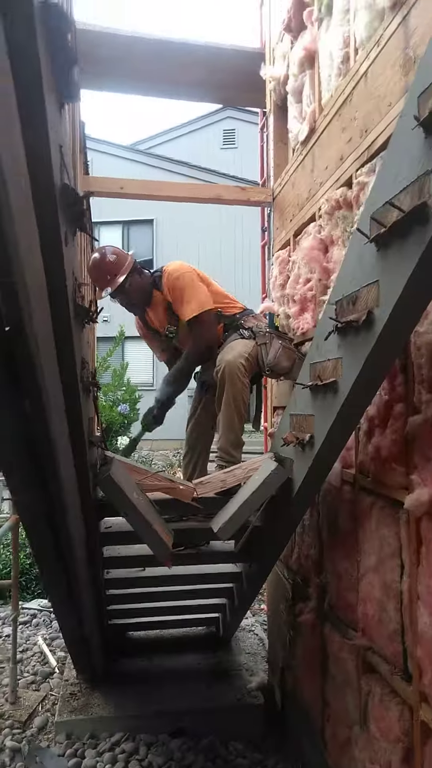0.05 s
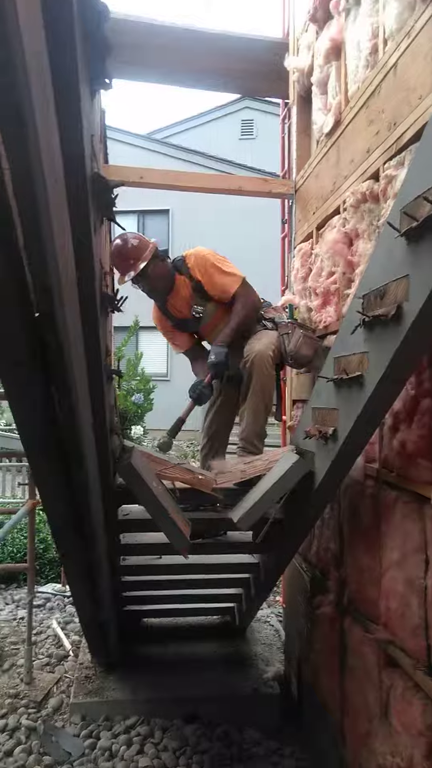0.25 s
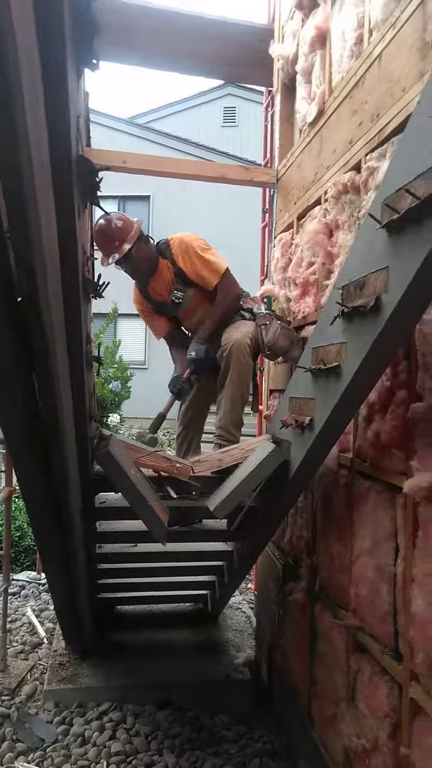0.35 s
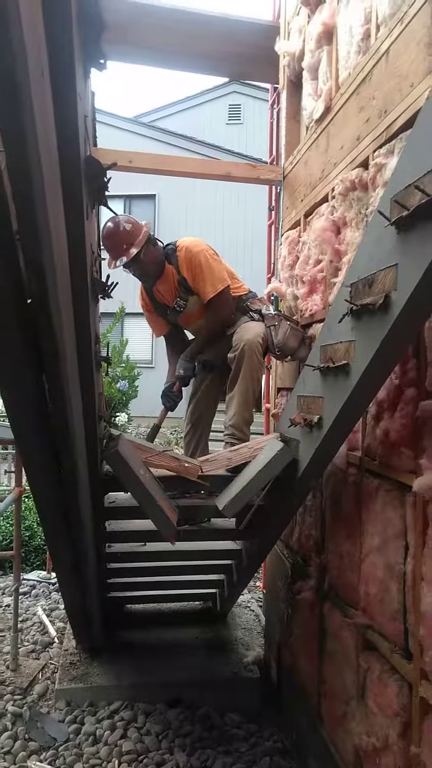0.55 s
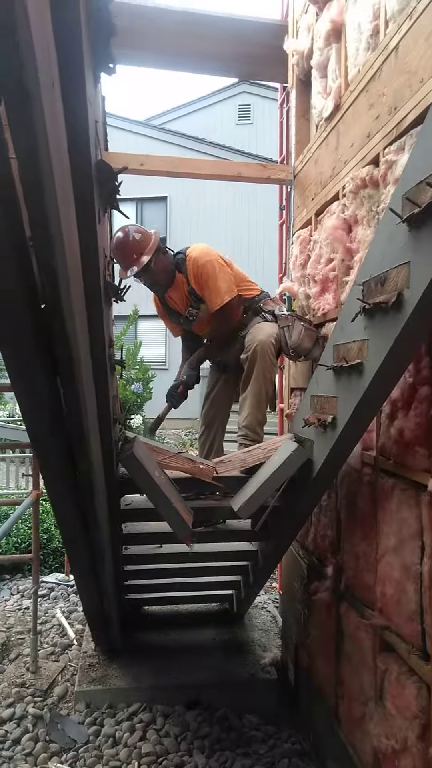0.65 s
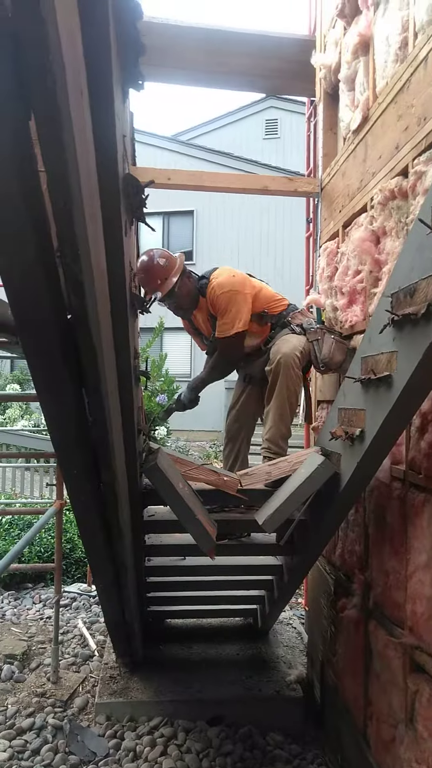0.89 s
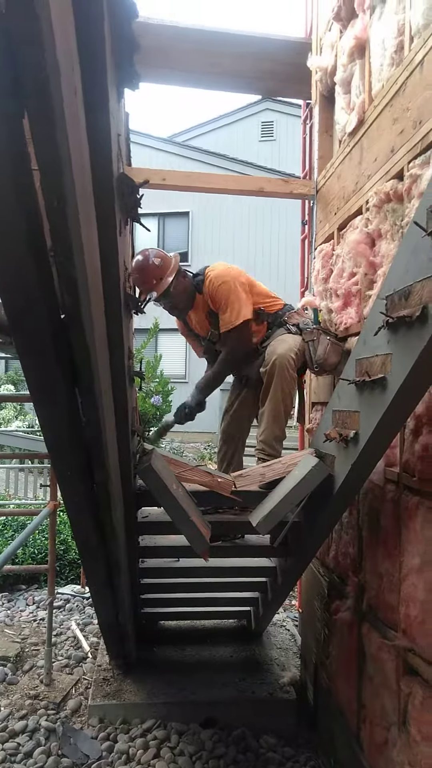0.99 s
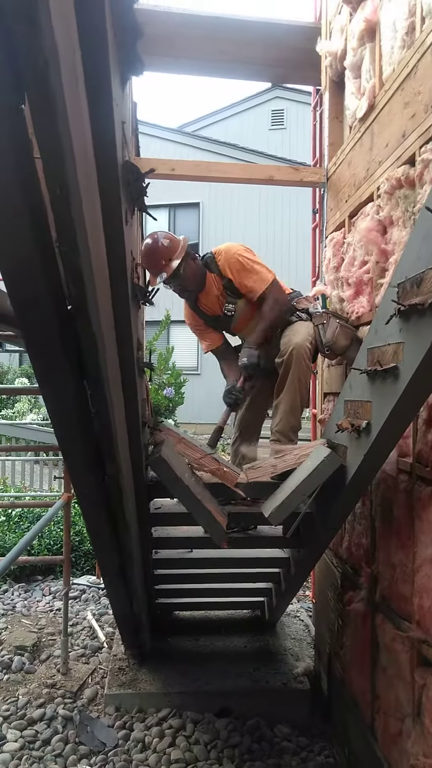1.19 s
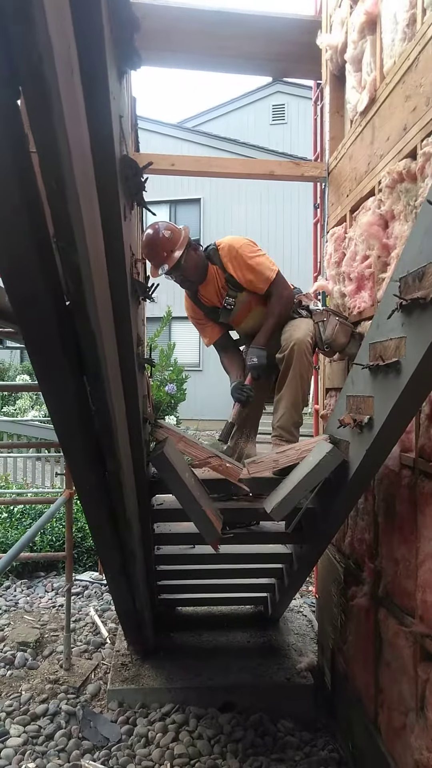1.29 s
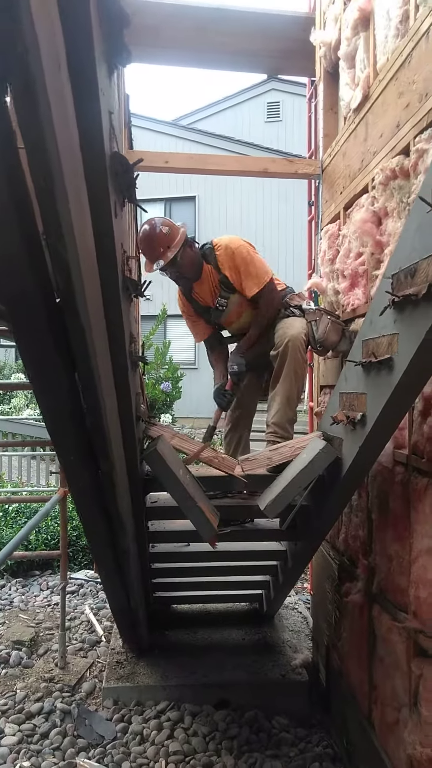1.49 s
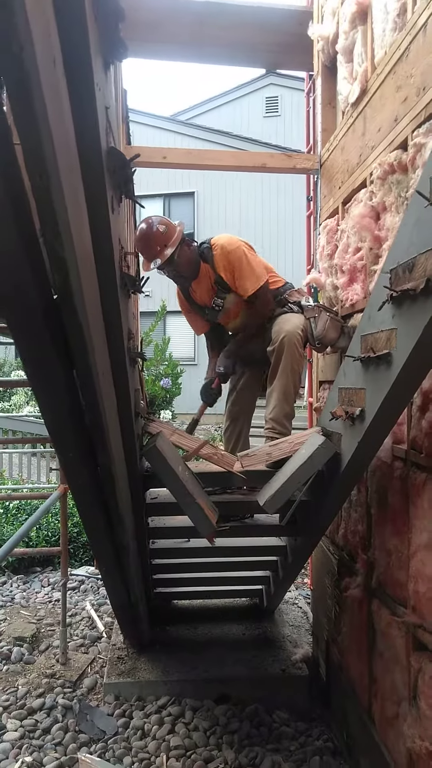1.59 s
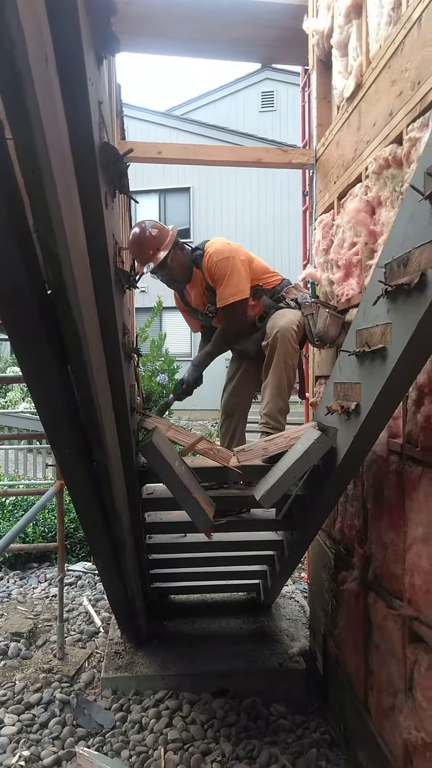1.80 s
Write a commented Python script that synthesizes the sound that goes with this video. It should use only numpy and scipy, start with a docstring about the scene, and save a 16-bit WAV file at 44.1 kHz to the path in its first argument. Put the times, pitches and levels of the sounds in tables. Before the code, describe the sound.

A sledgehammer hits wooden stairs twice, heard from underneath outdoors. Bright hiss, faint hum and a fading scrape open. At 0.2 s a loud splintering crack rings, rattles nails and shudders the frame; a board slaps back, dull thumps and chips tick until 0.6. Light ticks near 1.0, second blow at 1.16, softer knocks to 1.4, then a thin distant whine swells around 1.5. Peaks overload.

```python
"""Bright hiss with a faint hum, a thin far-off whine and a dying scrape; then a sledgehammer lands twice on wooden
stairs, heard from underneath on a building site. Noise bursts crack the boards, damped sines and decaying noise
ring them, peaky noise and metal modes rattle the loose parts, and low modes shudder the frame. Boards knock back
and bump, chips tick between the blows, and the blows overload the microphone."""
import sys
import numpy as np
from scipy import signal
from scipy.fft import rfft, irfft, next_fast_len
from scipy.io import wavfile
from scipy.ndimage import map_coordinates

SR = 44100
rng = np.random.default_rng(int(sys.argv[2]) if len(sys.argv) > 2 else 0)


def master(y):
    """Save y as 16-bit WAV."""
    cut = np.clip(np.atleast_2d(y).T, -1, 1)
    pcm = np.round(cut * 32767)  # scale
    wavfile.write(sys.argv[1], SR, pcm.astype(np.int16))


N = 81585  # samples


def amp(db):
    """Decibels to gain."""
    return 10 ** (np.asarray(db) / 20)


def unit(x):
    """Scale to rms 1."""
    return x / np.sqrt(np.mean(x ** 2) + 1e-20)


def along(points, hz):
    """Interpolate (Hz, value) points on a log frequency axis."""
    point_hz, value = np.transpose(points)
    return np.interp(np.log(hz + 1), np.log(point_hz + 1), value)


def level_curve(points):
    """Interpolate (s, dB) points over the whole scene."""
    return np.interp(since(0), *np.transpose(points))


def filtered(x, response):
    """Multiply the spectrum of x by a response of frequency."""
    size = next_fast_len(N + SR // 2)  # padded so that the ringing does not wrap round
    return irfft(rfft(x, size) * response(np.fft.rfftfreq(size, 1 / SR)), size)[:N]


def noise(spectrum):
    """Coloured noise of rms 1."""
    return unit(filtered(rng.standard_normal(N), lambda hz: amp(along(spectrum, hz))))


def wobble(rate_hz):
    """A smooth random curve with rate_hz knots a second."""
    return map_coordinates(rng.standard_normal(N // 8), [np.arange(N) * rate_hz / SR])


def grains(spectrum, depth_db, rate_hz):
    """Coloured noise whose level flickers at random, rms 1."""
    return unit(noise(spectrum) * amp(depth_db * wobble(rate_hz)))


def wavering(hz, width_hz):
    """A tone of rms 1 whose pitch wanders at random; width_hz sets how far."""
    pitch_hz = hz + width_hz * 0.5 * wobble(40)
    return np.sqrt(2) * np.sin(2 * np.pi * np.cumsum(pitch_hz) / SR)


def since(s):
    """Seconds since time s, zero before it."""
    return np.maximum(np.arange(N) / SR - s, 0)


def struck(t, attack_s, t60_s, hold_s=0):
    """Exponential attack, hold and exponential release."""
    return (1 - np.exp(-t / attack_s)) * amp(-60 * np.maximum(t - hold_s, 0) / t60_s)


def ring(modes, t, attack_s, pitch=1):
    """Sum of damped modes, each with a slightly new strength at every hit."""
    out = np.zeros(N)
    for hz, db, t60_s in modes:
        strength = amp(db + rng.normal(0, 1))
        out += strength * struck(t, attack_s, t60_s) * np.sin(2 * np.pi * (hz * pitch * t + rng.random()))
    return out


PEAK_DB, PEAK_SPACING_HZ = 3, 28.97


def peaky(x):
    """Colour x with many narrow resonances at random pitches, rms 1."""
    knots = rng.standard_normal(N // 8)
    return unit(filtered(x, lambda hz: amp(PEAK_DB * map_coordinates(knots, [hz / PEAK_SPACING_HZ]))))


# Level of the hiss. Each row: time in seconds, level in dB.
HISS = [(0, -32.5), (.18, -31), (.42, -30.5), (.65, -31.5), (.86, -32), (.98, -30), (1.13, -31.5),
        (1.38, -30), (1.6, -31.5), (1.85, -31)]
# Spectrum of the hiss and air. Each row: frequency in Hz, density in dB per Hz.
AIR = [(25, -16.5), (80, -9), (130, -20.5), (165, -28), (200, -23), (270, -22), (400, -25), (520, -18.5),
       (800, -20.5), (1100, -10), (1600, -17), (2300, -19.5), (2900, -15), (4500, -14.5), (5500, -13),
       (6400, -14.5), (8800, -8.5), (9700, -4), (11200, 0), (12500, -3.5), (14000, -10.5), (15700, -12.5)]
HUM_HZ, HUM_DB = 161.5, -61


def background():
    """Bright, slowly swelling noise for hiss and quiet outdoor air, plus a faint wavering hum."""
    hiss = amp(level_curve(HISS)) * noise(AIR)
    hum = amp(HUM_DB) * wavering(HUM_HZ, width_hz=3)
    return hiss + hum


# Level of the whine. Each row: time in seconds, level in dB.
WHINE = [(0, -56.5), (.45, -60), (.6, -49), (.75, -55.5), (.93, -52), (1.1, -55.5), (1.42, -54.5),
         (1.515, -36.5), (1.58, -45), (1.63, -41), (1.715, -49.5), (1.79, -41), (1.85, -43.5)]
# Partials of the whine. Each row: frequency in Hz, level in dB, pitch wander width in Hz.
WHINE_PARTIALS = [(1065, -11.5, 40), (1130, -12.5, 37.5), (1335, -9, 17.7), (1501, 0, 10.3), (1570, -8, 46),
                  (1973, -12.5, 41.8), (2810, -9.5, 25), (3000, -30, 27), (3680, -14.5, 22)]
# Spectrum of the rasp. Each row: frequency in Hz, density in dB per Hz.
WHINE_RASP = [(600, 1), (1100, -45.5), (1550, -18), (1950, 45), (2250, -22), (2800, -4), (3600, -4),
              (6000, 34)]
# Level of the late upper note. Each row: time in seconds, level in dB.
WHINE_UPPER = [(1.42, -77), (1.53, -59), (1.7, -66), (1.77, -50), (1.83, -43), (1.85, -48)]
WHINE_UPPER_HZ = 1935


def whine():
    """Wavering partials over noise rasp, swelling and fading far off; an upper note grows late."""
    tones = sum(amp(db) * wavering(hz, width_hz) for hz, db, width_hz in WHINE_PARTIALS)
    swell = amp(level_curve(WHINE) + 0.77 * wobble(46.8))
    flutter = amp(5.8 * wobble(120))
    upper = amp(level_curve(WHINE_UPPER)) * wavering(WHINE_UPPER_HZ, width_hz=41) * flutter
    return swell * (tones + noise(WHINE_RASP)) + upper


# The row: start in seconds, level in dB, t60 in seconds.
SCRAPE = (0, -31, 0.22)
# Spectrum of the scrape. Each row: frequency in Hz, density in dB per Hz.
SCRAPE_COLOUR = [(300, -17), (700, -19), (1090, 6), (1500, -19), (1950, 2), (2350, -5), (2800, -1.5),
                 (4000, -8.5), (5400, -6), (9000, -17), (15000, -34)]


def scrape():
    """A faint scrape: noise through random narrow resonances, dying away from the start."""
    start_s, db, t60_s = SCRAPE
    return amp(db) * peaky(noise(SCRAPE_COLOUR)) * struck(since(start_s), 0.00096, t60_s)


# Falling chips. Each row: start in seconds, level in dB.
CHIPS = [(.412, -42), (.483, -31), (0.541, -27.5), (0.583, -26), (1.013, -32.5), (1.065, -30)]
# Spectrum of a chip. Each row: frequency in Hz, density in dB per Hz.
CHIP = [(1000, -13), (4000, -11), (11000, -11), (15500, -2)]
CHIP_RISE_S, CHIP_T60_S = 0.00046, 0.12


def chips():
    """Falling debris: short bright bursts of flickering noise."""
    out = np.zeros(N)
    for start_s, db in CHIPS:
        out += amp(db) * grains(CHIP, 2.2, rate_hz=200) * struck(since(start_s), CHIP_RISE_S, CHIP_T60_S)
    return out


# Dull thumps. Each row: start in seconds, level in dB.
THUMPS = [(0.358, -23), (0.451, -21.5), (0.507, -31), (.715, -35), (1.537, -31)]
# Spectrum of a thump. Each row: frequency in Hz, density in dB per Hz.
THUMP = [(20, 0), (45, 0), (80, -1.5), (130, -10), (260, -30), (600, -51)]
THUMP_RISE_S, THUMP_T60_S = 0.0043, 0.2


def thumps():
    """The frame settles: soft-edged bursts of low noise."""
    return sum(amp(db) * noise(THUMP) * struck(since(start_s), THUMP_RISE_S, THUMP_T60_S)
               for start_s, db in THUMPS)


# Shifting boards. Each row: start in seconds, level in dB, frequency in Hz.
BUMPS = [(0.991, -44, 260), (1.084, -31.5, 270), (1.344, -24.5, 368), (1.421, -35, 290)]
BUMP_RISE_S, BUMP_T60_S = 0.0075, 0.13


def bumps():
    """Boards shift: each bump is one slow-rising damped mode."""
    return sum(ring([(hz, db, BUMP_T60_S)], since(start_s), BUMP_RISE_S) for start_s, db, hz in BUMPS)


# Spectrum of the timber. Each row: frequency in Hz, density in dB per Hz.
TIMBER = [(40, -29), (130, 0), (300, 0), (560, -1), (900, -8), (1700, -15), (3500, -31), (8000, -47)]
# Decay of the timber at damping 1. Each row: frequency in Hz, t60 in seconds.
TIMBER_T60 = [(100, 0.38), (300, 0.28), (600, 0.25), (1200, 0.17), (4000, 0.2)]
TIMBER_DB, TIMBER_BUILD_CYCLES = -0.5, 4


def timber(t):
    """Dense modes of stringers and walls as noise; the low ones build up slowest and last longest."""
    hz, frame_s, bins = signal.stft(noise(TIMBER), SR, nperseg=512)
    age_s = np.interp(frame_s, np.arange(N) / SR, t)
    attack_s = TIMBER_BUILD_CYCLES / (hz[:, None] + 1)
    envelope = struck(age_s, attack_s, along(TIMBER_T60, hz)[:, None])
    answer = signal.istft(bins * envelope, SR, nperseg=512)[1][:N]
    return amp(TIMBER_DB) * answer * (t > 0)


# Modes of the tread. Each row: frequency in Hz at pitch 1, level in dB before favouring, t60 in seconds at damping 1.
TREAD = [(150.1, -22, 0.49), (195, -16.5, 0.36), (248.2, -10, 0.34), (292.4, -11.5, 0.31),
         (326.2, -7, 0.23), (387, -12.5, 0.32), (480, -5, 0.19), (547, -3, 0.075), (583, -2.5, 0.096),
         (644.5, -11, 0.17), (783, -22.5, 0.33), (1019.4, -25.5, 0.32), (1216, -15, 0.16), (1772, -7, 0.11),
         (2524, -18, 0.081), (2666, -18, 0.09)]
TREAD_DB, TREAD_ATTACK_S = 1.5, 0.00056
FAVOUR_DB, FAVOUR_OCTAVES = 9, 0.24


def tread(t, favoured_hz, damping, pitch):
    """The board's damped modes; the point of contact favours those near one pitch."""
    modes = []
    for hz, db, t60_s in TREAD:
        octaves_away = np.log2(hz / favoured_hz)
        boost_db = FAVOUR_DB * np.exp(-(octaves_away / FAVOUR_OCTAVES) ** 2)
        modes.append((hz, db + boost_db, t60_s / damping))
    return amp(TREAD_DB) * ring(modes, t, TREAD_ATTACK_S, pitch)


# Resonances of split wood. Each row: centre in Hz, width in Hz, level in dB.
SPLINTERS = [(750, 66, 15), (1004, 15, 15), (1300, 61, 0.5), (1705, 110, 3.5), (2413, 52, 13),
             (2750, 83, -2), (3094, 80, -3), (4150, 160, 3.5), (5126, 86, 9.5)]


def splintery(x):
    """Add narrow resonances of split wood to x, rms 1."""
    def response(hz):
        out = 1
        for centre_hz, width_hz, db in SPLINTERS:
            damped = 1j * hz * width_hz
            out = out + amp(db) * damped / (centre_hz ** 2 - hz ** 2 + damped)
        return out
    return unit(filtered(x, response))


# Spectrum of the crack. Each row: frequency in Hz, density in dB per Hz.
CRACK = [(400, -11.5), (1500, -1.5), (2700, 3), (4000, -2.5), (7000, -5.5), (11500, -16), (13000, -8)]
CRACK_DB, CRACK_GRAIN_DB = -5, 1.5
CRACK_RISE_S, CRACK_T60_S = 0.00067, 0.15


def crack(t):
    """Fibres split: flickering noise through narrow resonances, with a sharp attack."""
    fibres = splintery(grains(CRACK, CRACK_GRAIN_DB, rate_hz=350))
    return amp(CRACK_DB) * fibres * struck(t, CRACK_RISE_S, CRACK_T60_S)


def wood_hit(start_s, crack_db, favoured_hz, damping, pitch=1):
    """One contact: fibres crack, the tread rings and the timber around it answers."""
    t = since(start_s)
    wood = tread(t, favoured_hz, damping, pitch) + timber(t * damping)
    return wood + amp(crack_db) * crack(t)


def softened(x, cutoff_hz):
    """A softer contact loses its treble: second-order low-pass."""
    return signal.sosfilt(signal.butter(2, cutoff_hz, fs=SR, output="sos"), x)


# Loosened boards. Each row: start in seconds, level in dB, crack in dB, favoured frequency in Hz,
# damping as a ratio, soft-contact cut-off in Hz.
KNOCKS = [(.241, -7, 2.5, 325, 1.5, 11860), (.265, -29, -5.5, 786, 2.9, 3500),
          (1.21, -10.5, -3, 325, 1.65, 2750), (1.269, -12.5, -27, 308, 3.4, 605)]


def knocks():
    """Loosened boards slap back: lighter wood hits with softened contact."""
    out = np.zeros(N)
    for start_s, db, crack_db, favoured_hz, damping, cutoff_hz in KNOCKS:
        hit = wood_hit(start_s, crack_db, favoured_hz, damping)
        out += amp(db) * softened(hit, cutoff_hz)
    return out


# Spectrum of the rattle. Each row: frequency in Hz, density in dB per Hz.
RATTLE = [(2000, -53), (4900, -19), (5300, 2), (6500, -7.5), (8500, -3), (11000, -1.5), (11900, -6),
          (12300, -3), (16000, -46)]
RATTLE_DB, RATTLE_GRAIN_DB = -11.5, -0.5
RATTLE_RISE_S, RATTLE_HOLD_S, RATTLE_T60_S = 0.0055, 0.048, 0.23


def rattle(t):
    """Loose nails and splinters: flickering noise, held briefly, through random narrow resonances."""
    parts = peaky(grains(RATTLE, RATTLE_GRAIN_DB, rate_hz=400))
    return amp(RATTLE_DB) * struck(t, RATTLE_RISE_S, RATTLE_T60_S, RATTLE_HOLD_S) * parts


# Modes of nails and brackets. Each row: frequency in Hz at pitch 1, level in dB, t60 in seconds.
METAL = [(5180, -14.5, 0.75), (5460, -14, 0.99), (5850, -6, 0.17), (7550, -28, .25), (9160, -46, 0.11),
         (10350, 0, 0.13), (11560, 18.5, 0.15), (11300, -22, 0.24)]
METAL_DB = -23


def nails(t, pitch):
    """Nails and brackets: damped metal modes with a random flutter in level."""
    return amp(METAL_DB) * ring(METAL, t, RATTLE_RISE_S, pitch) * amp(3 * wobble(150))


# Sway modes of the stair frame. Each row: frequency in Hz, level in dB, t60 in seconds.
FRAME = [(16.67, 0.5, 0.77), (30.92, -4.5, 0.88), (42.56, -0.5, 0.7), (73.96, 2, 0.48), (100.4, -2.5, .52)]
FRAME_DB, FRAME_DELAY_S, FRAME_RISE_S = -17, 0.02756, 0.021


def shudder(start_s):
    """The stair frame sways: low damped modes, rising late and slowly."""
    return amp(FRAME_DB) * ring(FRAME, since(start_s + FRAME_DELAY_S), FRAME_RISE_S)


# Hammer blows. Each row: start in seconds, wood level in dB, crack in dB, rattle in dB, shudder in dB,
# pitch as a ratio, favoured frequency in Hz, damping as a ratio.
BLOWS = [(.207, -1, 3, -7, 5, 1.02, 532, 1.053), (1.1634, -0.5, -2.5, -9, 3.5, 1.0, 500, 0.96)]


def hammer():
    """Each blow hits the wood, rattles the loose parts, rings the nails and shakes the frame."""
    out = np.zeros(N)
    for start_s, db, crack_db, rattle_db, shudder_db, pitch, favoured_hz, damping in BLOWS:
        t = since(start_s)
        out += amp(db) * wood_hit(start_s, crack_db, favoured_hz, damping, pitch)
        out += amp(rattle_db) * (rattle(t) + nails(t, pitch))
        out += amp(shudder_db) * shudder(start_s)
    return out


def scene():
    """Everything that sounds on and around the staircase, as one channel."""
    surroundings = whine() + scrape() + chips()
    settling = thumps() + bumps() + knocks()
    return (surroundings + settling + hammer())[None]


CLIP_HARDNESS = 6


def overload(x, top):
    """Round off peaks at the level top."""
    return x / (1 + np.abs(x / top) ** CLIP_HARDNESS) ** (1 / CLIP_HARDNESS)


# Microphone response. Each row: frequency in Hz, gain in dB.
MIC = [(20, -4), (4000, -1.5), (8000, 5), (10500, 10.5), (11900, 10.5), (12300, -2), (15500, -3)]
CLIP_TOP, CEILING, TOP_HZ = 0.49, 0.9, 15800


def record(dry):
    """The microphone overloads, colours the sound, adds the background, limits it and cuts the top."""
    coloured = filtered(overload(dry[0], CLIP_TOP), lambda hz: amp(along(MIC, hz)))
    limited = overload(coloured + background(), CEILING)
    return filtered(limited, lambda hz: hz < TOP_HZ)[None]


dry = scene()
out = record(dry)
master(out)
```